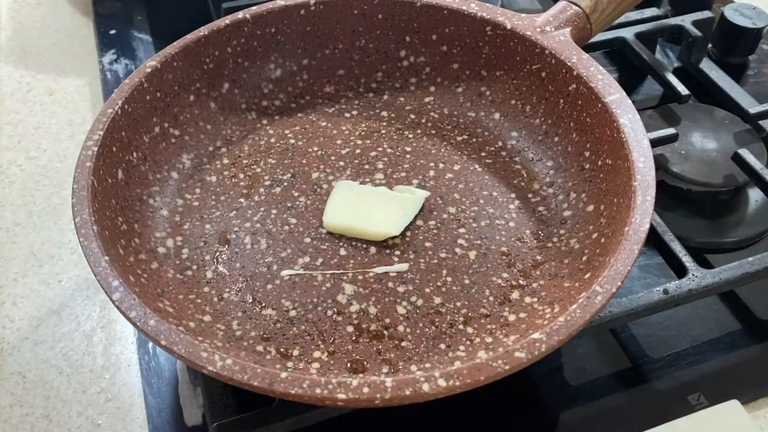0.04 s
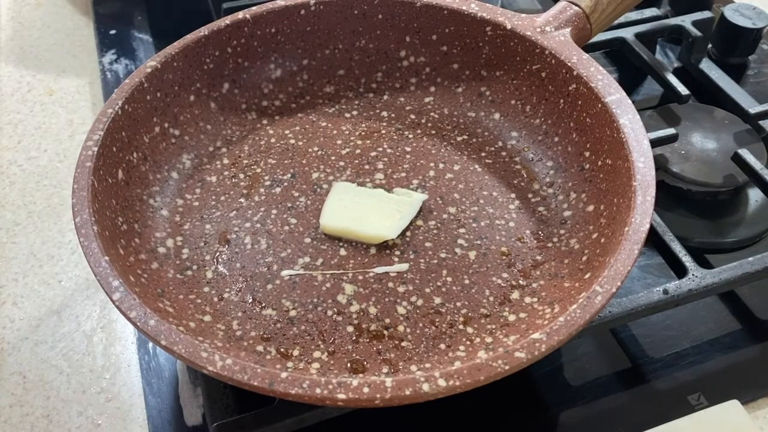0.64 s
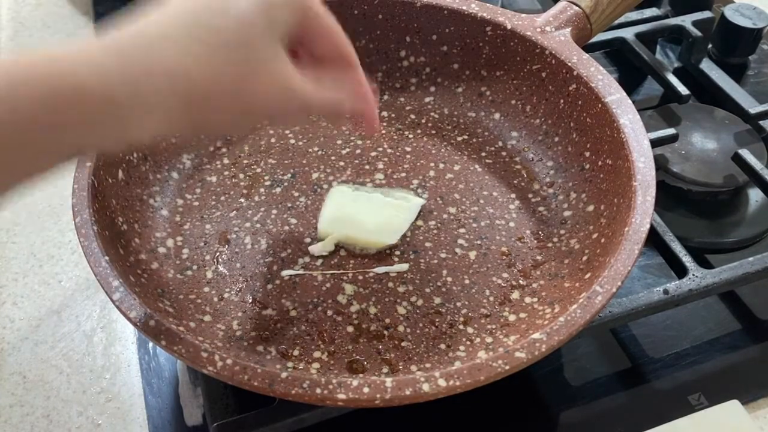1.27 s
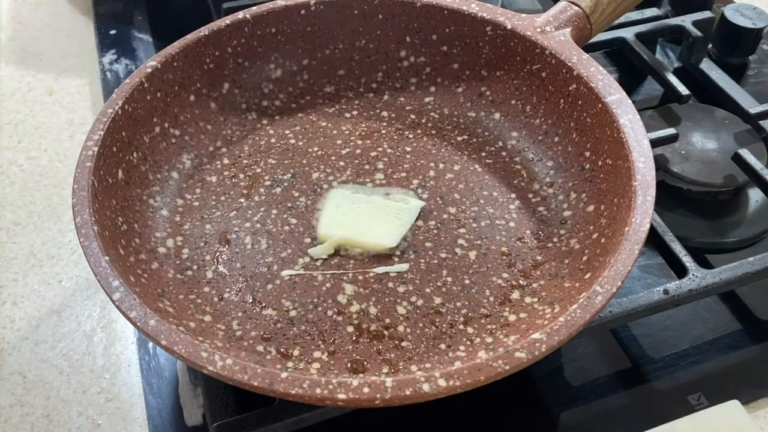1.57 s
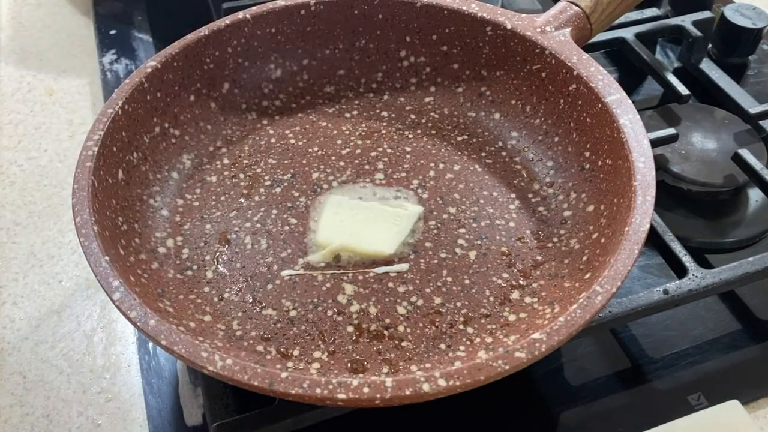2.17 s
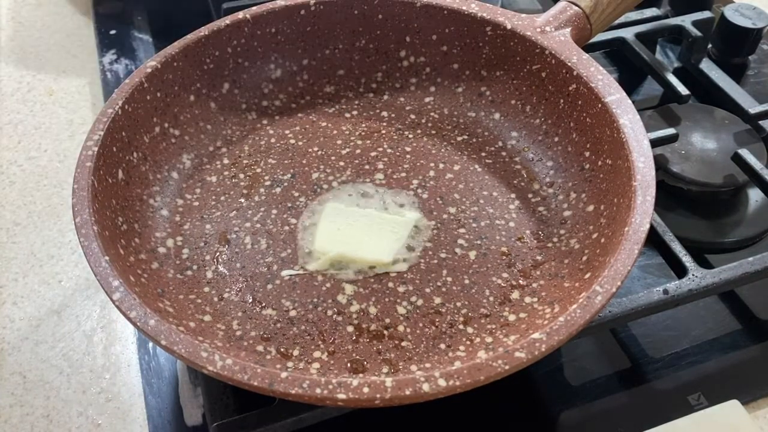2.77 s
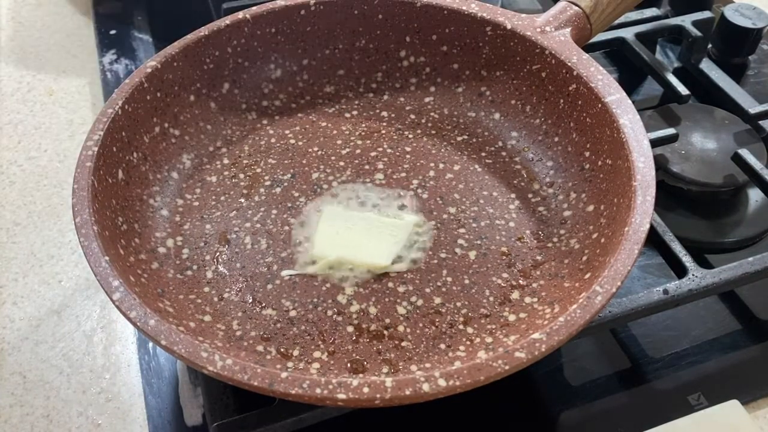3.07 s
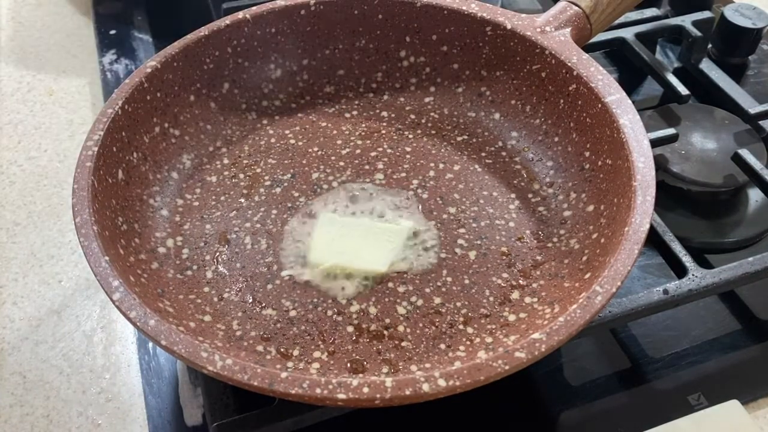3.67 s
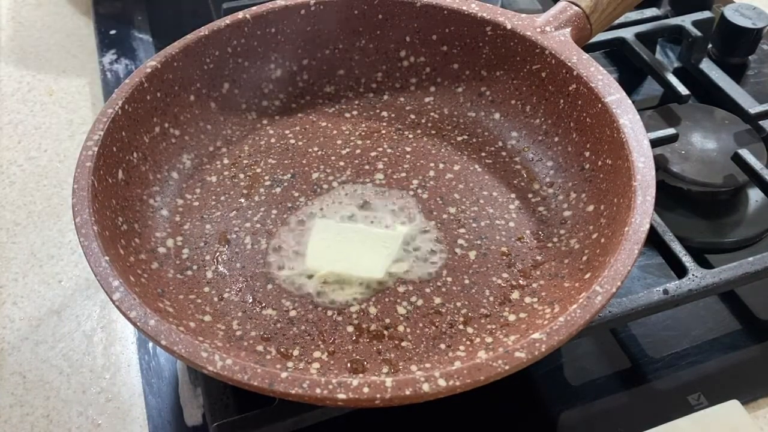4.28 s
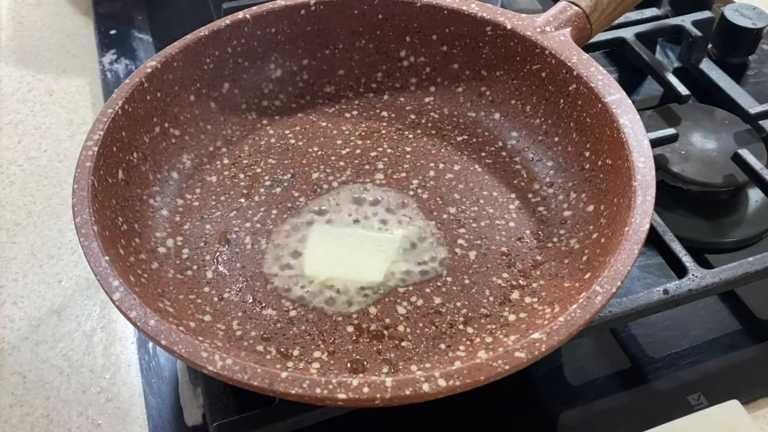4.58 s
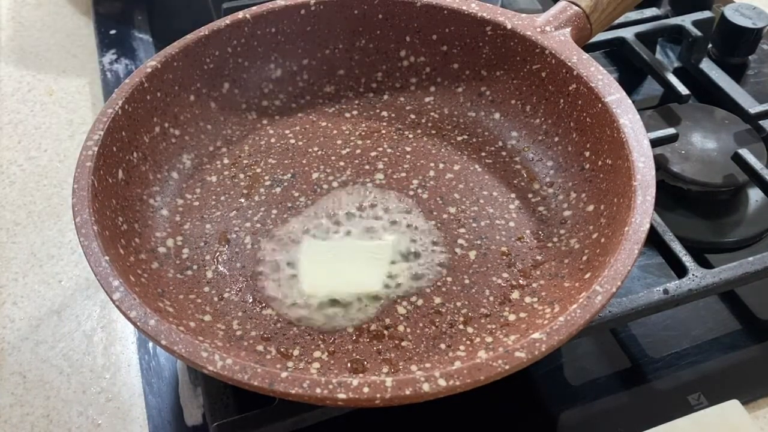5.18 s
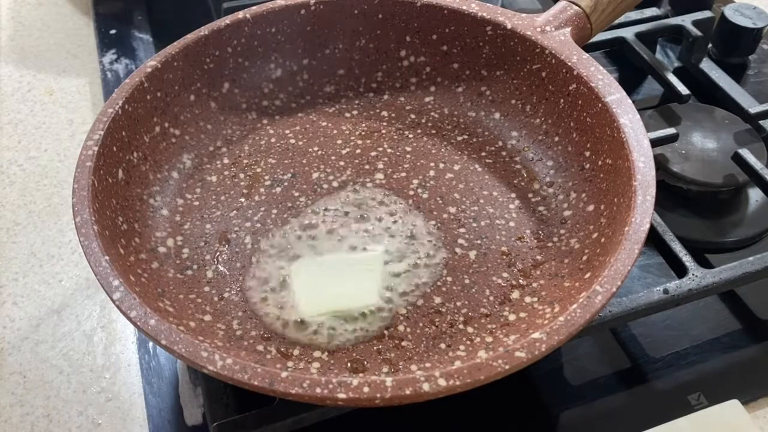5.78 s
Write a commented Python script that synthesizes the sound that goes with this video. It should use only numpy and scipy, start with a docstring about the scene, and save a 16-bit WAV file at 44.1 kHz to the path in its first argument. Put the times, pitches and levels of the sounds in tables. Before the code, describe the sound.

Small spits of butter in a hot pan thicken into a soft, steady sizzle with tiny pops, heard close up over a low gas burner. Louder kitchen noises ring briefly in the room around it: first a cupboard thudding shut, then a dish shoved along the counter in stuttering scrapes until it meets a jar. Near the end a second dish clacks down, followed by a light clink of cutlery.

```python
"""A gas flame rushes and its jet whistles faintly over an appliance hum. Butter melts in the hot pan:
water drops burst in single spits, then steam bubbles multiply into a fine, foaming sizzle. At 2 s a
cupboard shuts with a thud, and the first of three dull thumps comes through the floor. From 2.7 s a dish
is shoved over the counter in stick-slip motion until it meets a jar. At 5.1 s a second dish is set down
with a clack, and last a piece of cutlery clinks. Each struck body rings in its own damped modes."""
import sys
import numpy as np
from scipy import signal
from scipy.fft import rfft, irfft
from scipy.io import wavfile

SR = 44100
rng = np.random.default_rng(int(sys.argv[2]) if len(sys.argv) > 2 else 0)


def put_to_file(sound):
    """Save the sound as 16-bit audio at rate SR, in the file named by the first command-line argument."""
    columns = np.atleast_2d(sound).T  # one column per channel
    safe = np.clip(columns, -1, 1)
    whole_steps = np.round(safe * 32767)
    wavfile.write(sys.argv[1], SR, whole_steps.astype(np.int16))


N = 261513

# spectrum of the burner and kitchen background: (frequency [Hz], level [dB])
FLAME_SPECTRUM = [(25, -14.5), (55, 2), (95, -4), (155, 1.5), (230, -5), (450, -15.5), (700, -9),
                  (900, -12), (1080, -10), (1400, -12.5), (1700, -15), (2400, -18.5), (6000, -20),
                  (15000, -17.5)]
# whistle of the gas jet: (frequency [Hz], bandwidth [Hz], level [dB])
JET_BANDS = [(1288, 31, -65.5), (1930, 78, -75), (3708, 50, -72), (4270, 190, -77)]
# appliance hum: (frequency [Hz], level [dB])
HUM_PARTIALS = [(59.2, -70.5), (150.7, -69)]

# vigour of the frying, with a lull and a surge as the butter slumps: (time [s], level [dB])
SIZZLE_ENVELOPE = [(0, -73), (0.45, -63), (0.85, -58.5), (1.24, -52.5), (1.31, -57), (1.39, -47),
                   (1.47, -49.5), (1.8, -46.5), (2.6, -46.5), (3.45, -47.5), (5.93, -46.5)]
# spectra of the frying: (frequency [Hz], level [dB])
SIZZLE_SPECTRUM = [(500, -37), (1000, -13.5), (2000, -1.5), (3000, -2), (4500, -3), (6000, -1.5),
                   (7300, 0.5), (9000, 2), (10200, -0.5), (11800, 2.5), (13700, 1), (15600, 1.5)]
SPIT_SPECTRUM = [(500, -15), (2000, 0.5), (6000, -4.5), (12000, 7.5), (15600, 0.5)]
# the loudest spits of fat: (time [s], level [dB])
LOUD_SPITS = [(.1590, -41.5), (0.3357, -41), (0.425, -43), (0.9522, -40), (1.1868, -37), (1.2475, -37.5),
              (2.5453, -36), (3.3343, -35)]
# resonances of the pan under the foam: (frequency [Hz], bandwidth [Hz], level [dB])
PAN_RESONANCES = [(895, 39, 2), (1295, 116, -4.5), (2510, 70, -2.5), (2890, 220, -1.5), (3320, 210, 0),
                  (3876, 230, 2), (4430, 180, 2.5), (5040, 430, -3)]
# large bubbles that pop with a pitch: (time [s], frequency [Hz], level [dB])
BUBBLE_POPS = [(1.283, 2830, -43), (3.143, 3200, -41), (3.895, 3830, -37.5), (4.154, 3850, -38.5)]

# blows on each body: (time [s], level [dB], decay time factor [1], spectral tilt [dB/octave])
CUPBOARD_BLOWS = [(2.0105, -14, 0.72, 1), (2.042, -24.5, 0.78, -2.5), (2.150, -33.5, 0.72, -2.5),
                  (2.172, -30.5, 0.44, -2), (3.683, -41, 0.36, 4)]
SLIDING_DISH_BLOWS = [(3.950, -39, 0.97, -0.5), (3.997, -34, 0.58, -2.5), (4.0325, -25, 0.95, 1),
                      (4.2595, -27, 0.19, 0.5), (4.438, -42.5, 0.64, 6)]
JAR_BLOWS = [(4.5345, -36, 0.79, 5)]
SECOND_DISH_BLOWS = [(5.1322, -13, 1, -0.5), (5.176, -38, 0.55, 5), (5.327, -23, 0.069, 1)]
CUTLERY_BLOWS = [(5.4103, -42.5, 0.86, 3.5), (5.4232, -26, 0.89, -1)]
# normal modes of each body: (frequency [Hz], level [dB], T60 at a decay time factor of 1 [s])
CUPBOARD_MODES = [(151.5, -25, 0.73), (285, -27, 0.385), (480.5, -17.5, 0.27), (526, -26, 1),
                  (603, -33, 0.16), (659, -22.5, 0.67), (789, -18.5, 0.29), (815, -21, 0.44),
                  (844, -16, 0.51), (1060, -26, 0.32), (1300, -26, .18), (1430, -19, 0.27),
                  (1640, -27, 0.28), (2726, -17, 0.086)]
SLIDING_DISH_MODES = [(280.5, -7, 0.15), (702, -7, 0.37), (1124, -3, 0.22), (2022, -5, 0.2),
                      (2960, -12, 0.13)]
STRUCK_JAR_MODES = [(590, -0.5, 0.24), (783, 0.5, 0.11), (1121, -7.5, 0.22), (2580, -6, 0.022)]
SECOND_DISH_MODES = [(647, -19.5, 0.12), (860, -25, 0.43), (1040, -23, 0.52), (1176, -22, 0.28),
                     (1940, -5.5, 0.055), (2020, 0, 0.13), (2880, -16.5, 0.088), (4310, -20.5, 0.15)]
CUTLERY_MODES = [(4840, -3.5, 0.074), (4990, -3, 0.1), (5933, -6, 0.55), (8530, -6, 0.2),
                 (10130, -4.5, 0.2), (11556, -5.5, 0.12), (12670, 2, 0.16), (13095, -5, 0.17),
                 (15358, 0, 0.12)]
# spectra of impact and friction noise: (frequency [Hz], level [dB])
THUD_SPECTRUM = [(50, -16), (100, -19), (150, -5), (300, 0), (500, 4.5), (850, 4.5), (1450, 2.5),
                 (2000, -5.5), (2900, -12.5), (4000, -23.5), (6500, -29.5), (14000, -43)]
THUMP_SPECTRUM = [(25, -22), (55, 18), (100, 7), (160, 3), (300, -35), (1000, -54)]
FRICTION_SPECTRUM = [(100, -15.5), (200, -6.5), (300, 5), (560, 9.5), (740, 3), (950, -32), (1500, -8),
                     (2600, -31), (5000, -32)]
BUMP_SPECTRUM = [(120, -8), (300, 1), (650, 6.5), (1200, -22.5), (2000, -11.5), (2800, -12), (3600, -19),
                 (8000, -30)]
CLACK_SPECTRUM = [(120, -19), (380, -16), (680, -7.5), (1000, -7.5), (1400, 3.5), (2000, -0.5), (2800, -5),
                  (4400, -11.5), (6000, -26), (14000, -40)]
CLINK_SPECTRUM = [(300, -12), (2000, -13.5), (4800, 0.5), (9000, -3), (15000, -7.5)]
# soft thumps through the floor: (time [s], level [dB])
FLOOR_THUMPS = [(2.03, -53), (3.689, -49.5), (4.637, -50.5)]
# shoves that drag the dish: (time [s], duration [s], level [dB])
DISH_SHOVES = [(2.703, 0.058, -50), (3.795, 0.027, -49.5), (3.878, 0.059, -43), (3.932, 0.056, -35.5),
               (3.998, 0.067, -41.5), (4.08, 0.05, -48.5), (4.208, 0.028, -39), (4.254, .07, -37),
               (4.363, 0.022, -40.5), (4.429, 0.032, -39), (4.475, 0.033, -45.5)]

# reverberation time of the kitchen: (frequency [Hz], T60 [s])
ROOM_T60 = [(150, 0.69), (700, 0.78), (1800, 0.8), (5000, 0.44), (14000, 0.2)]


def from_db(db):
    """Amplitude ratio: a factor of ten for every 20 dB."""
    return 10 ** (np.asarray(db) / 20)


def unit_rms(x):
    """Normalisation to unit mean power."""
    return x / np.sqrt(np.mean(x ** 2) + 1e-20)


def envelope(points):
    """Linear interpolation of a level at every sample."""
    return np.interp(np.arange(N) / SR, *np.transpose(points))


def at_hz(points, hz):
    """Interpolation on a logarithmic frequency axis."""
    known_hz, values = np.transpose(points)
    return np.interp(np.log(hz + 1e-9), np.log(known_hz), values)


def coloured(x, spectrum):
    """Minimum-phase filtering imposes a spectrum causally; the result has rms 1."""
    size = 2 ** 12
    magnitude = from_db(at_hz(spectrum, np.fft.rfftfreq(size, 1 / SR)))
    cepstrum = irfft(np.log(magnitude))
    response = irfft(np.exp(rfft(2 * cepstrum[:size // 2], size)))
    return unit_rms(signal.fftconvolve(x, response)[:len(x)])


def drift(per_s):
    """Random modulation: straight lines join standard Gaussian values."""
    knots = rng.standard_normal(4096)
    return np.interp(np.arange(N) / SR * per_s, np.arange(len(knots)), knots)


def decay(t, t60):
    """Exponential damping: 60 dB in t60 seconds."""
    return np.exp(-np.log(1000) * t / max(t60, 1e-4))


def resonance(x, hz, width_hz):
    """Forced response of a damped two-pole resonator with unit peak gain."""
    radius = np.exp(-np.pi * width_hz / SR)
    feedforward = np.array([1, 0, -1]) * (1 - radius ** 2) / 2
    feedback = [1, -2 * radius * np.cos(2 * np.pi * hz / SR), radius ** 2]
    return signal.lfilter(feedforward, feedback, x + 1e-18)


def add(track, s, sound):
    """Superposition of a sound on a track, from time s."""
    start = round(s * SR)
    track[start:start + len(sound)] += sound[:N - start]


def clicks(per_s, spread_db):
    """Shot noise: random impulses of uneven size, scaled so that power is independent of rate."""
    sizes = from_db(spread_db * np.minimum(rng.exponential(1, N), 4)) * rng.choice([-1, 1], N)
    chance = np.clip(per_s / SR, 1e-4, 1)
    return unit_rms(sizes * (rng.random(N) < chance) / np.sqrt(chance))


def bubbles(per_s, spread_db, low_hz, high_hz, width_hz, sizes=16):
    """Bubble resonance: each burst rings briefly at a pitch set by the size of its bubble."""
    bursts = clicks(per_s, spread_db)
    size = rng.integers(0, sizes, N)
    pitches = np.linspace(low_hz, high_hz, sizes)
    return unit_rms(sum(resonance(bursts * (size == k), hz, width_hz) for k, hz in enumerate(pitches)))


def knock(spectrum, t60):
    """Modal overlap: many close modes, excited about equally by a blow, merge into decaying noise."""
    fade = decay(np.arange(SR // 2) / SR, t60)
    burst_bins = rfft(rng.standard_normal(len(fade)) * fade, 2 * len(fade))
    white_burst = irfft(burst_bins / np.abs(burst_bins))[:len(fade)]
    return coloured(white_burst, spectrum) * np.sqrt(np.mean(fade ** 2))


def struck(blows, modes, spectrum, knock_db, knock_t60, shudder_db, shudder_t60, free_s=0.1, damp_db=0):
    """Impact response: a short knock, a shudder, and normal modes that drop in level after free_s."""
    out, t = np.zeros(N), np.arange(SR // 2) / SR
    mode_hz, mode_db, mode_t60 = np.transpose(modes)
    damping = from_db(damp_db * np.clip((t - free_s) / 0.0088, 0, 1))   # the body comes to rest
    for s, db, decay_factor, tilt in blows:
        # a harder contact is brighter
        tilted = [(hz, level + tilt * np.log2(hz / 1000)) for hz, level in spectrum]
        gains = from_db(mode_db + tilt * np.log2(mode_hz / 1000) + 0.39 * rng.standard_normal(len(modes)))
        ring = sum((-1) ** k * gains[k] * np.sin(2 * np.pi * hz * t) * decay(t, t60 * decay_factor)
                   for k, (hz, t60) in enumerate(zip(mode_hz, mode_t60)))
        contact = from_db(knock_db) * knock(tilted, knock_t60)
        shudder = from_db(shudder_db) * knock(tilted, shudder_t60 * decay_factor)
        add(out, s, from_db(db) * (ring * damping + contact + shudder))
    return out


def burner():
    """Flow noise: a broadband flame and a narrowband jet whistle, over a wavering appliance hum."""
    t = np.arange(N) / SR
    hold_s, drop_db, drop_s, fade_db_per_s = 0.66, 2, 0.1, 3   # the whistle holds, drops, then recedes
    flame = from_db(-57 + 0.4 * drift(21)) * coloured(rng.standard_normal(N), FLAME_SPECTRUM)
    jet = sum(from_db(db) * unit_rms(resonance(rng.standard_normal(N), hz, width))
              for hz, width, db in JET_BANDS)
    hum = sum(np.sqrt(2) * from_db(db + 3 * drift(6)) * np.sin(2 * np.pi * hz * t + 0.75 * drift(19))
              for hz, db in HUM_PARTIALS)
    receding_s = np.maximum(t - hold_s, 0)
    jet_db = 0.5 - drop_db * np.minimum(receding_s / drop_s, 1) - fade_db_per_s * receding_s
    return flame + from_db(jet_db) * jet + hum


def butter():
    """Resonant excitation: tiny steam bubbles sizzle and crackle; larger ones in the foam ring the pan."""
    melt_s, foam_growth_s, foam_db = 0.58, 0.83, -52.5
    spreading_s = np.maximum(np.arange(N) / SR - melt_s, 0)
    per_s = 740 + 5800 * spreading_s   # bubbles multiply as the melt spreads
    fine = bubbles(per_s, spread_db=1.5, low_hz=885, high_hz=14760, width_hz=2500)
    crackle = bubbles(140, spread_db=7, low_hz=4400, high_hz=14900, width_hz=190)
    uncovered = np.sqrt(per_s.min() / per_s)   # the crackle stands out until foam covers it
    sizzle = coloured(fine + from_db(-5.5) * uncovered * crackle, SIZZLE_SPECTRUM)
    large = bubbles(0.3 * per_s, spread_db=0.5, low_hz=684, high_hz=5620, width_hz=920)
    foam = unit_rms(sum((-1) ** k * from_db(db) * resonance(large, hz, width)
                        for k, (hz, width, db) in enumerate(PAN_RESONANCES)))
    sizzle_gain = from_db(envelope(SIZZLE_ENVELOPE) + 1.24 * drift(45))
    foam_gain = (1 - np.exp(-spreading_s / foam_growth_s)) * from_db(foam_db + 1.3 * drift(35))
    return sizzle_gain * sizzle + foam_gain * foam


def spit():
    """Impulsive source: a water drop bursts in the fat with a sharp crack and a short spray."""
    crack = knock(SPIT_SPECTRUM, t60=0.0044)
    spray = knock(SPIT_SPECTRUM, t60=0.046)
    return crack / np.abs(crack).max() + from_db(-6) * spray


def spitting_fat():
    """A Poisson process of small spits follows the sizzle's level; loud spits and pops have set times."""
    out, t = np.zeros(N), np.arange(SR // 10) / SR
    spits_per_s, over_sizzle_db, spread_db = 7, 9, 2.5
    onsets = rng.random(N) < spits_per_s / SR
    sizes = from_db(envelope(SIZZLE_ENVELOPE) + over_sizzle_db + spread_db * rng.standard_normal(N))
    add(out, 0, signal.fftconvolve(onsets * sizes, spit()))
    for s, db in LOUD_SPITS:
        add(out, s, from_db(db) * spit())
    for s, hz, db in BUBBLE_POPS:
        add(out, s, from_db(db) * np.sin(2 * np.pi * hz * t) * decay(t, t60=0.033))
    return out


def cupboard():
    """Free vibration: the cupboard shuts with a thud and its modes ring out."""
    return struck(CUPBOARD_BLOWS, CUPBOARD_MODES, THUD_SPECTRUM,
                  knock_db=1, knock_t60=0.029, shudder_db=-15, shudder_t60=0.26)


def floor_thumps():
    """Structure-borne sound: heavy bumps arrive through the floor mostly as bass."""
    out = np.zeros(N)
    for s, db in FLOOR_THUMPS:
        add(out, s, from_db(db) * knock(THUMP_SPECTRUM, t60=0.15))
    return out


def sliding_dish():
    """Stick-slip friction at its foot drives the modes of the dish, which also bumps and rocks."""
    t = np.arange(N) / SR
    grip_s, skid_t60 = 0.02, 0.13   # each shove builds up, holds and skids to rest
    force = sum(from_db(db) * np.clip((t - s) / grip_s, 0, 1)
                * decay(np.maximum(t - s - duration, 0), skid_t60) for s, duration, db in DISH_SHOVES)
    uneven_grip = from_db(2 * drift(70))
    friction = force * uneven_grip * coloured(clicks(1200, spread_db=-1), FRICTION_SPECTRUM)
    singing = sum(from_db(db + 12.7 * np.log2(hz / 1000))
                  * resonance(friction, hz, width_hz=np.log(1000) / np.pi / t60)
                  for hz, db, t60 in SLIDING_DISH_MODES)
    bumps = struck(SLIDING_DISH_BLOWS, SLIDING_DISH_MODES, BUMP_SPECTRUM, knock_db=-4, knock_t60=0.062,
                   shudder_db=-10.5, shudder_t60=0.15, free_s=0.032, damp_db=-10)
    return from_db(-6) * friction + from_db(15) * singing + bumps


def jar():
    """Impact excitation: the sliding dish stops against a jar, which rings briefly."""
    return struck(JAR_BLOWS, STRUCK_JAR_MODES, BUMP_SPECTRUM,
                  knock_db=2, knock_t60=0.019, shudder_db=-23.5, shudder_t60=0.083)


def second_dish():
    """Contact damping: a dish set down with a clack loses much of its ring as it settles."""
    return struck(SECOND_DISH_BLOWS, SECOND_DISH_MODES, CLACK_SPECTRUM, knock_db=-7, knock_t60=0.057,
                  shudder_db=-23.5, shudder_t60=0.76, free_s=0.031, damp_db=-9)


def cutlery():
    """Inharmonic vibration: two quick touches excite the high modes of a piece of cutlery."""
    return struck(CUTLERY_BLOWS, CUTLERY_MODES, CLINK_SPECTRUM, knock_db=-6.5, knock_t60=0.05,
                  shudder_db=-9, shudder_t60=0.13, free_s=0.023, damp_db=-6)


def kitchen(x):
    """Reverberation: the diffuse field decays at its own rate in each band of about an octave."""
    t, tail = np.arange(SR) / SR, 0
    edges_hz = np.geomspace(60, 17000, 9)
    for low, high in zip(edges_hz, edges_hz[1:]):
        band_pass = signal.butter(2, [low, high], "band", fs=SR, output="sos")
        band = signal.sosfilt(band_pass, rng.standard_normal(SR))
        tail = tail + band * decay(t, at_hz(ROOM_T60, np.sqrt(low * high)))
    tail = tail * (1 - decay(t, 0.021))   # the first reflections take a few ms to arrive
    return signal.fftconvolve(x, unit_rms(tail) / np.sqrt(SR))[:N]


def scene():
    """Superposition of direct and reverberant sound at one point, alike in both channels."""
    pan = butter() + spitting_fat()
    slide = sliding_dish() + jar()
    thuds, clack, clink = cupboard(), second_dish(), cutlery()
    reverberation = kitchen(from_db(-12) * pan + from_db(-8) * thuds + from_db(-14) * slide
                            + from_db(-16.5) * clack + from_db(-11) * clink)
    return np.tile(pan + thuds + slide + clack + clink + reverberation + floor_thumps() + burner(), (2, 1))


def record(dry):
    """Band limiting removes the deepest rumble and the highest treble."""
    low_cut = signal.butter(2, 28, "high", fs=SR, output="sos")
    top_cut = signal.ellip(12, 0.1, 80, 15750, fs=SR, output="sos")
    return signal.sosfilt(np.vstack([low_cut, top_cut]), dry)


dry = scene()
out = record(dry)
put_to_file(out)
```